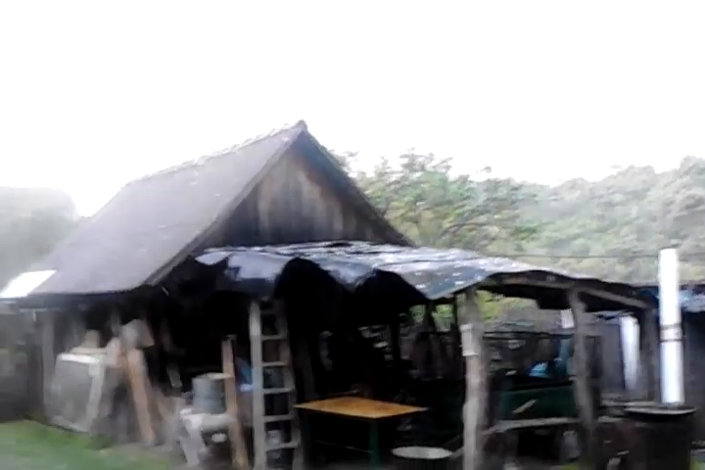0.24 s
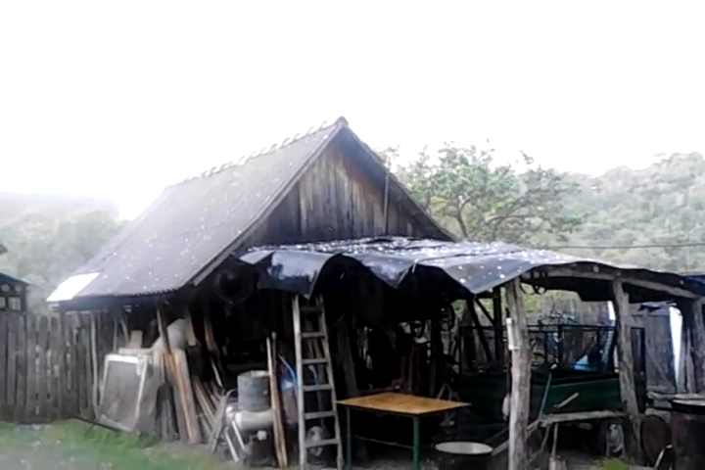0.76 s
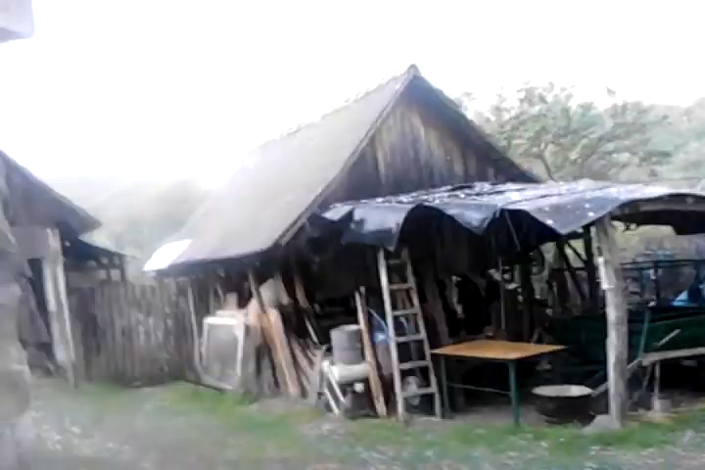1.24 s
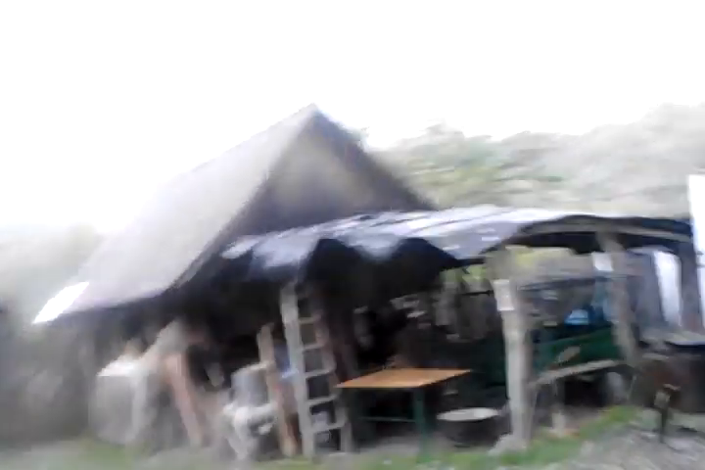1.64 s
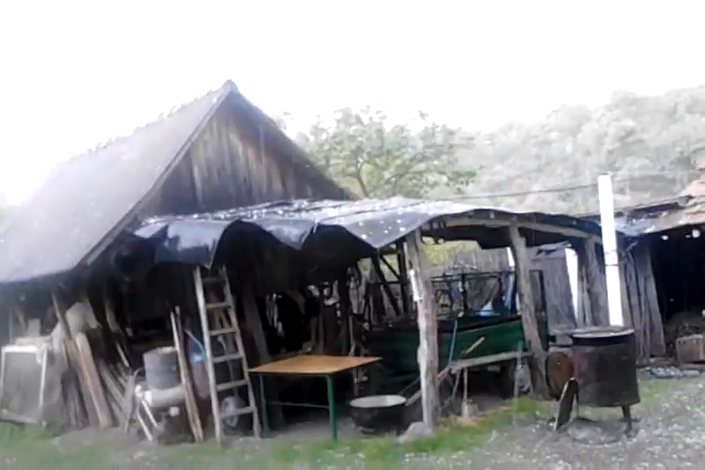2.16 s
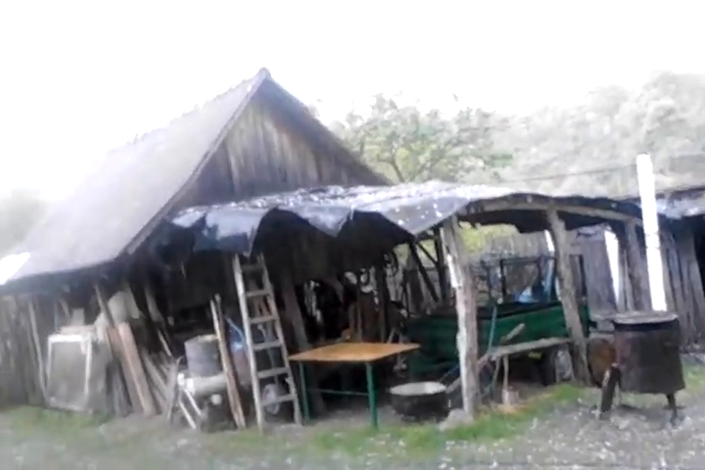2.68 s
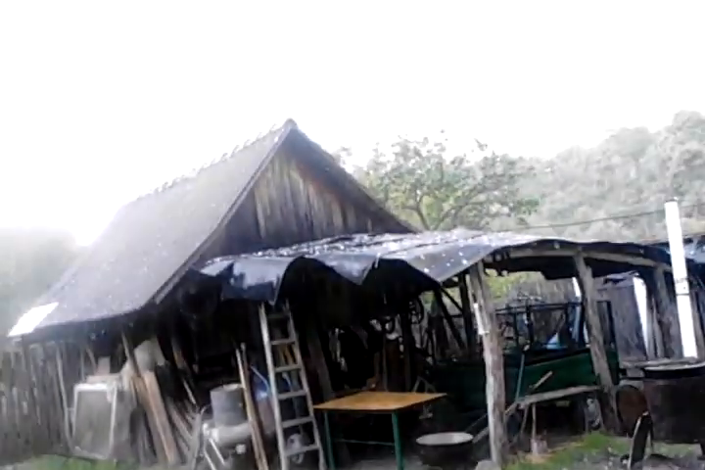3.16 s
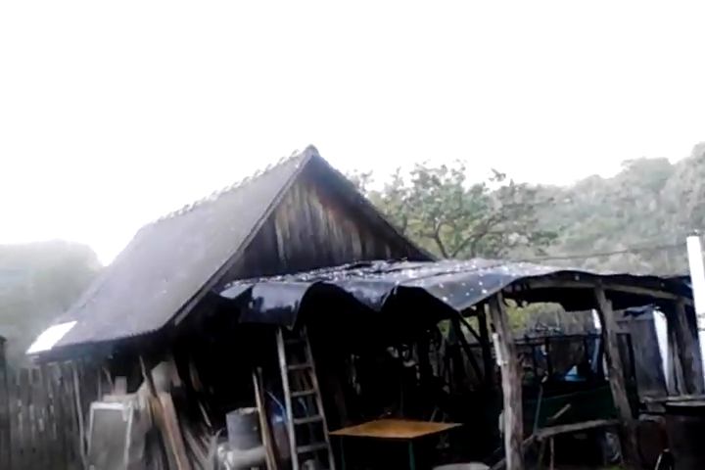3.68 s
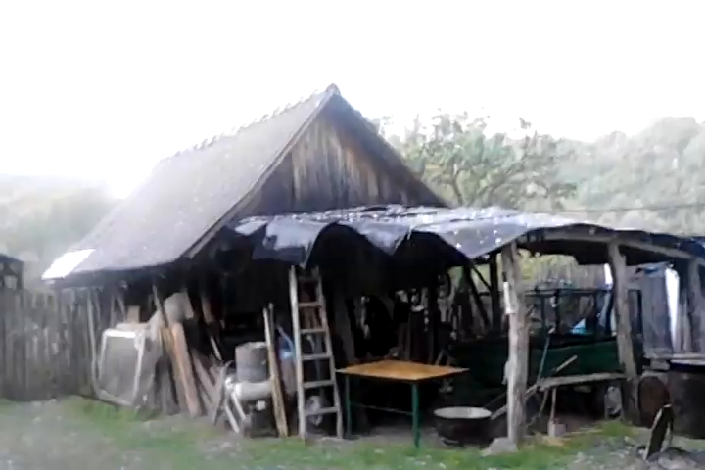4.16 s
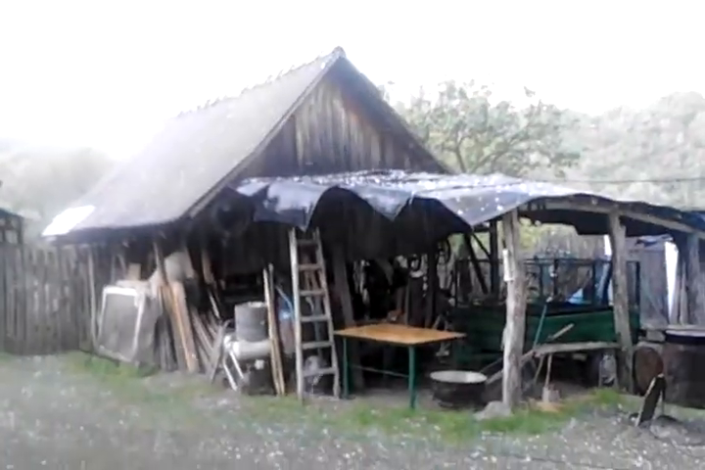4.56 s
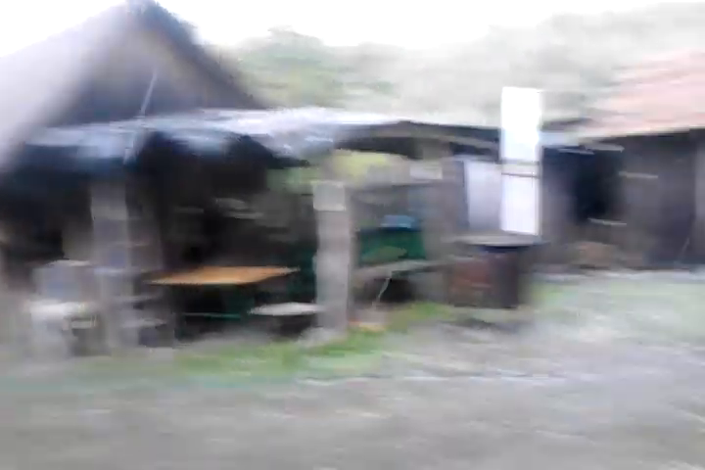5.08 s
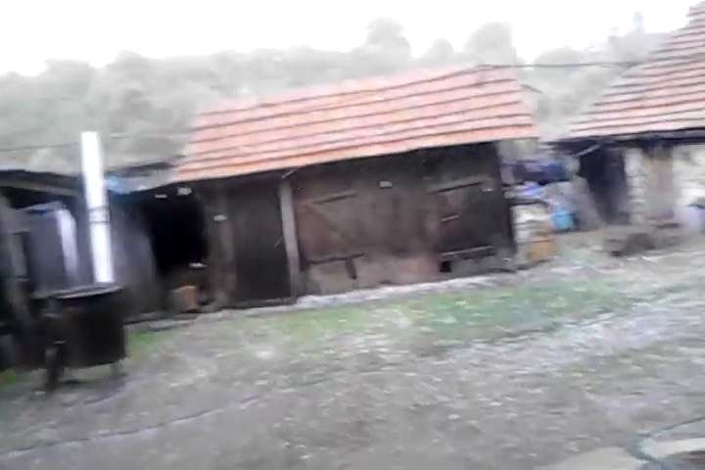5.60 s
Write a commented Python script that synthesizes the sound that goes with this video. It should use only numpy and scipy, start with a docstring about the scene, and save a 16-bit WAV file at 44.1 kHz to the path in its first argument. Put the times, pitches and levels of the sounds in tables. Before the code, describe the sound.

Large hailstones strike close by on a shed roof, boards and tarpaulin, each a dry brief clatter with short fluttering ring and tiny bounces. The quiet opening bursts into hard irregular hits after about a second, busiest around two to three seconds, then sparser and softer until a strong woody knock near the end. Behind lies a fluctuating hail hiss and rumble, outdoors, through a cheap single-capsule microphone.

```python
"""Large hailstones land close by on a shed roof, a tarpaulin and a yard: each gives a short clatter
of ice splinters, bounces and echoes, made of five bands of patchy noise.
Strikes and bounces ring boards, tarpaulin frame and roof sheets as fluttering damped tones.
Behind them countless far stones blur into a patchy noise hiss with a rumble that swells on its own.
All is heard through a small one-capsule microphone."""
import sys
import numpy as np
from scipy import signal
from scipy.fft import rfft, irfft
from scipy.io import wavfile
from scipy.ndimage import uniform_filter1d

SR = 44100
rng = np.random.default_rng(int(sys.argv[2]) if len(sys.argv) > 2 else 0)


def generate_wav(sig):
    """Save sig (samples, or channels by samples) to the path in sys.argv[1] as 16-bit PCM at SR."""
    pcm = np.round(np.clip(np.atleast_2d(sig).T, -1, 1) * 32767).astype(np.int16)
    wavfile.write(sys.argv[1], SR, pcm)


N = 257544
EDGE_HZ = 7330  # top of the band that the microphone passes

# the far hail shower: (time [s], hiss level [dB], lift of the rumble above the hiss [dB])
SHOWER = [(0.0, -57, 21.5), (0.23, -55.5, 13.5), (0.58, -58, 15), (1.22, -59.5, 11.5), (1.41, -48.5, 10),
          (1.74, -55.5, 18.5), (1.84, -51, 12.5), (2.019, -48.5, 7.5), (2.57, -48, 17.5), (2.81, -46, 8.5),
          (3.09, -47, 8), (3.48, -48.5, 14), (4.06, -47.5, 11.5), (4.26, -51.5, 11), (4.7, -54.5, 14.5),
          (4.98, -54, 6.5), (5.55, -58.5, 17.5), (5.69, -48, -9), (5.84, -47, 11.5)]
# modes of the roof sheets: (frequency [Hz], relative level [dB], t60 at ring length 1 [s])
SHEETS = [(1970, -2, 0.28), (2230, 4, 0.11), (2580, 3.5, 0.11), (2820, 3, 0.17), (3104, 2, 0.14),
          (3380, 0, 0.079), (3850, 2, 0.13), (4025, -6, 0.19), (4530, -2.5, 0.12), (4990, -7, 0.14),
          (5370, 0.5, 0.12), (5920, 0.5, 0.16), (6530, -2, 0.2), (6990, 7.5, 0.079)]


def gain_of(db):
    """Amplitude factor of a level in dB."""
    return 10 ** (np.asarray(db) / 20)


def evened(x):
    """Scales x to an RMS of one."""
    return x / np.sqrt(np.mean(abs(x) ** 2) + 1e-20)


def read(points, hz):
    """Reads a curve of (Hz, value) points along a logarithmic frequency axis."""
    f, value = np.transpose(points)
    return np.interp(np.log(hz + 1), np.log(f + 1), value)


def add(mix, s, sound):
    """Adds a sound to the mix from time s on, cut at the end of the mix."""
    part = mix[round(s * SR):][:len(sound)]
    part += sound[:len(part)]


def shaped(x, gain):
    """Multiplies the spectrum of x by gain(Hz)."""
    return irfft(rfft(x) * gain(np.fft.rfftfreq(N, 1 / SR)), N)


def patchy_noise(patch_db, flick_db, ping_db, ping_share, ping_t60=.2):
    """White noise with patches and wide-band flicks; small stones lift narrow bands that die away."""
    hop = 128
    frames = N // hop + 5
    real, imag, patch, flick = rng.standard_normal((frames, 257, 4)).T  # each: frequency x time

    # patches last longer, flicks span more of the spectrum
    patch = uniform_filter1d(patch, size=8, axis=0)
    patch = evened(uniform_filter1d(patch, size=16, axis=1))
    flick = uniform_filter1d(flick, size=40, axis=0)
    flick = evened(uniform_filter1d(flick, size=4, axis=1))

    draw, size = rng.random((frames, 257, 2)).T
    struck = (draw < ping_share) * gain_of(ping_db * (1 + size) / 2) ** 2
    kept_per_frame = gain_of(-120 * hop / SR / ping_t60)  # of the power, hence 120
    pings = signal.lfilter([1], [1, -kept_per_frame], struck, axis=1)
    pings = uniform_filter1d(pings, size=2, axis=0)

    spectrum = (real + 1j * imag) * gain_of(patch_db * patch + flick_db * flick) * np.sqrt(1 + pings)
    return evened(signal.istft(spectrum, nperseg=512, noverlap=512 - hop)[1][:N])


def shower_db(when):
    """Hiss level of the far shower at the given times."""
    s, hiss_db, _ = np.transpose(SHOWER)
    return np.interp(when, s, hiss_db)


def hiss():
    """Countless far stones blur into shaped noise; the rumble under 500 Hz swells on its own."""
    # spectrum of the far shower: (frequency [Hz], relative level per Hz [dB])
    far_spectrum = [(24, -43.5), (40, -3), (64, -23.5), (157, 5), (253, -8), (455, 1.5), (542, -2.5),
                    (750, 5), (1570, 7.5), (2950, 0.5), (5180, -0.5), (7180, -6.5), (9330, -50),
                    (15800, -120)]
    t = np.arange(N) / SR
    s, _, rumble_db = np.transpose(SHOWER)
    far = patchy_noise(patch_db=1.2, flick_db=1.6, ping_db=11.5, ping_share=.005)
    wash = evened(shaped(far, lambda hz: gain_of(read(far_spectrum, hz))))
    low = shaped(wash, lambda hz: 1 / (1 + (hz / 500) ** 4))
    rumble = low * gain_of(np.interp(t, s, rumble_db))
    return gain_of(shower_db(t)) * (wash - low + rumble)


def small_strikes():
    """Small stones strike at random moments, each at the pitch of one roof-sheet mode."""
    pings_per_s, reach_octaves, length = 24, 0.04, 0.7
    above_hiss_db, spread_db = -1, 2.5
    when, size, spot = rng.random((round(pings_per_s * N / SR), 3)).T
    s = when * N / SR
    db = shower_db(s) + above_hiss_db + spread_db * (2 * size - 1)
    spot_hz = np.array(SHEETS)[(spot * len(SHEETS)).astype(int), 0]
    return [(*row, reach_octaves, length) for row in zip(s, spot_hz, db)]


def ring(hz, db, rise, t60, rough=0.59, flutter_hz=30, flutter_per_khz=25):
    """A damped tone; neighbouring modes and echoes make it flutter, more so in the treble."""
    hold = 1.163  # above 1 a ring holds a moment and then dies quickly
    t = np.arange(round(.3 * SR)) / SR
    pole = np.exp(-2 * np.pi * (flutter_hz + flutter_per_khz * hz / 1000) / SR)
    real, imag = rng.standard_normal((len(t), 2)).T
    flutter = evened(signal.lfilter([1], np.poly([pole, pole]), real + 1j * imag))

    # low tones start clean, and all grow rougher as echoes arrive
    grown = np.clip(hz / 9000 + rough * t / 0.015, 0, .95)
    wander = np.sqrt(1 - grown ** 2) + grown * flutter
    tone = (wander * np.exp(2j * np.pi * hz * t)).imag

    up = np.sin(np.pi / 2 * np.minimum(t / rise, 1)) ** 2
    fall_db = -60 * (np.maximum(t - rise, 0) / t60) ** hold
    return gain_of(db + fall_db) * up * tone


def rings():
    """Each strike rings the few modes nearest its pitch, the farther ones more weakly."""
    # modes of boards and tarpaulin frame:
    # (frequency [Hz], relative level [dB], t60 at ring length 1 [s])
    boards = [(152, 0.5, 0.11), (184, 0, 0.25), (316.6, 4, 0.15), (429.4, 1, 0.11), (514.3, -0.5, 0.12),
              (601, 4, 0.12), (622, -2.5, 0.18), (681, 1.5, 0.14), (705, 5, 0.83), (812, -1.5, 0.12),
              (1051, 1, 0.11), (1220, 1, 0.097), (1440, 4.5, 0.095), (1660, 0.5, 0.15), (1807, -5, 0.093)]
    # stones and bounces that set the modes ringing: (time [s], pitch the struck spot favours [Hz],
    # level [dB], reach around that pitch [octaves], ring length [multiple of the mode's t60])
    strikes = [(0.058, 684, -54, .03, 1.5), (0.354, 5950, -49, .3, .7), (0.36, 589, -53, .03, 1.5),
               (0.386, 308, -54, .05, .9), (0.497, 1770, -46, .03, .7), (0.643, 153, -44.5, .05, .9),
               (0.725, 6050, -40, .15, .5), (0.738, 515, -42, 0.048, 3.2), (0.957, 1714, -49, .05, 1.9),
               (1.006, 6767, -41.5, .04, 1.1), (1.102, 3710, -44, .04, .9), (1.246, 3743, -41.5, .07, 1.3),
               (1.255, 1436, -48.5, .04, 1.6), (1.288, 812, -45, 0.044, 2.8), (1.335, 812, -33.5, .04, 3.5),
               (1.37, 1056, -22, .04, .9), (1.373, 1770, -9.5, .03, .8), (1.373, 292, -29, .1, .6),
               (1.41, 312, -27, .05, .8), (1.39, 3320, -37.5, .04, 3.2), (1.415, 588, -28, .04, .8),
               (1.489, 4020, -37.5, 0.031, 1.8), (1.601, 4430, -36, .04, .8), (1.693, 4500, -19.5, .3, .9),
               (1.706, 1645, -37, 0.023, 2.4), (1.721, 330.6, -40, .1, .9), (1.744, 3950, -31.5, 0.11, 1.6),
               (1.786, 5040, -29, .05, .9), (1.795, 1960, -45, .04, .9), (1.892, 5010, -27, .04, 1.6),
               (1.95, 1960, -39.5, .04, .9), (2.03, 1770, -24.5, .03, 1.6), (2.134, 2820, -27, .03, 1.1),
               (2.152, 2600, -25, .04, .9), (2.158, 1798, -26, .12, .9), (2.165, 671, -33, .04, .7),
               (2.17, 430, -36.5, .05, .9), (2.292, 1436, -24.5, .04, 1.1), (2.294, 3376, -36.5, .04, 1.1),
               (2.334, 1482, -31, .04, 2.4), (2.376, 1436, -43, .04, .9), (2.395, 6740, -36.5, .05, 1.4),
               (2.446, 4060, -36, .04, 1.1), (2.495, 3705, -29.5, .04, 1.6), (2.548, 1645, -38, .03, 1.7),
               (2.572, 5800, -27.5, .1, 1.9), (2.576, 3170, -29, .04, 1.2), (2.582, 4800, -30, .1, .8),
               (2.585, 1960, -32, .04, 1.4), (2.601, 4120, -24.5, .08, 1.2), (2.618, 2230, -31, .04, 1.3),
               (2.693, 1185, -13.5, 0.075, .3), (2.694, 1960, -14.5, 0.045, .3),
               (2.705, 1645, -18, .05, .9), (2.7, 4000, -35, .25, 1.2), (2.716, 1145, -19, 0.082, .9),
               (2.7, 811, -28.5, 0.082, .9), (2.754, 1185, -32, 0.048, 1.9), (2.921, 2275, -24, .04, .9),
               (2.96, 1056, -26.5, .04, 1.4), (2.976, 1185, -21, .04, 1.1), (2.95, 678.5, -34, 0.038, 1.3),
               (2.962, 1550, -31.5, 0.14, 1.5), (3.082, 6020, -39, .15, .9), (3.188, 3850, -42, .06, 1.9),
               (3.3, 6220, -32.5, .12, 1.4), (3.303, 3680, -29.5, 0.043, 2.6), (3.309, 1056, -37, .04, 3.5),
               (3.31, 2297, -35.5, 0.05, 3.2), (3.324, 5330, -31.5, .03, 1.4), (3.344, 1056, -23, .04, .8),
               (3.344, 804, -27.5, .04, 1.4), (3.33, 470, -27, .15, .9), (3.437, 1645, -35.5, .03, .5),
               (3.445, 182, -30.5, .05, 1.1), (3.5, 3730, -39, .04, .9), (3.557, 4412, -27.5, .04, 1.2),
               (3.659, 1056, -36, .04, .9), (3.671, 4580, -36, .04, .5), (3.78, 727, -35.5, .03, 1.3),
               (3.853, 812, -13.5, .04, .6), (3.853, 4050, -18, .04, .6), (3.854, 5540, -23.5, .07, .7),
               (3.862, 515, -13.5, .04, .8), (3.87, 430, -27, .05, .8), (3.895, 3726, -27, .04, .8),
               (3.944, 3980, -38.5, .08, 1.1), (3.995, 4300, -40.5, 0.17, .9), (4.092, 6970, -52, .04, .9),
               (4.19, 3680, -36, .04, .9), (4.475, 1185, -32, .04, .9), (4.474, 4450, -38, .2, .9),
               (4.522, 153, -37.5, .05, 1.4), (4.546, 3680, -33, .04, .6), (4.55, 6550, -41.5, .04, .7),
               (4.613, 3300, -32.5, .12, .4), (4.783, 312, -35.5, .05, 1.1), (4.934, 3370, -40.5, .04, .6),
               (5.123, 727, -48, 0.033, .3), (5.373, 6530, -44, .12, .7), (5.413, 312, -45.5, .05, .8),
               (5.452, 684, -47.5, .03, 1.6), (5.515, 552, -36, .07, 1.9), (5.578, 812, -46, .04, .8),
               (5.657, 635.6, -5.5, 0.049, .5), (5.678, 622, -12.5, 0.022, .9), (5.657, 503, -22, .04, 1.4),
               (5.669, 153, -20.5, .05, .6), (5.676, 3160, -31.5, .04, 1.4), (5.687, 4440, -31.5, .04, 1.5),
               (5.687, 1418, -25, 0.048, 1.2), (5.7, 1660, -30, .04, .6), (5.712, 2236, -28, .04, .7),
               (5.722, 622, -31, .03, 1.1), (5.73, 3140, -38, .04, .9)]
    nearest, reach_db = 4, 6  # modes per strike; loss one reach away from its pitch
    out, modes = np.zeros(N), np.array(boards + SHEETS)
    for s, spot_hz, db, reach, length in strikes + small_strikes():
        away = abs(np.log2(modes[:, 0] / spot_hz)) / reach
        for k in np.argsort(away)[:nearest]:
            hz, mode_db, t60 = modes[k]
            rise = (0.0043 + 1.2 / hz) * length ** 0.6  # a longer ring also swells more slowly
            add(out, s, ring(hz, db + mode_db - reach_db * away[k] ** 2, rise, t60 * length))
    return out


def roof_colour(hz):
    """The roof favours a few bands and passes no deep bass."""
    # resonances in the clatter: (centre [Hz], width [Hz], height [dB])
    resonances = [(783, 140, 6.5), (1140, 150, 3), (1700, 290, 4.5), (2120, 170, 0.5), (2820, 130, -1.5),
                  (3484, 230, 7), (4170, 300, 4.5), (5180, 760, 5), (5940, 350, 3.5), (6600, 250, 1.5),
                  (6900, 250, 1.5)]
    bumps_db = sum(db / (1 + (2 * (hz - centre_hz) / width) ** 2)
                   for centre_hz, width, db in resonances)
    return gain_of(bumps_db) / (1 + (115 / (hz + 1)) ** 4)


def swell(rise, fade, crack=0.04, crack_s=0.00085, tail_db=-22, tail=0.016):
    """Power of a clatter: a crack at the blow, a rise, a shoulder that drops away, a faint yard echo."""
    t = np.arange(round(.45 * SR)) / SR
    up = np.sin(np.pi / 2 * np.minimum(t / rise, 1)) ** 2
    after = np.maximum(t - rise, 0)
    shoulder = np.exp(-(after / fade) ** 2.4)
    echo = gain_of(tail_db) ** 2 * np.exp(-after / tail)
    blow = crack * np.e * t / crack_s * np.exp(-t / crack_s)
    return up * (shoulder + echo) + blow


def stones():
    """Near stones clatter in five overlapping noise bands; the thud peaks later, the treble fades sooner."""
    # centres of thud, knock, clack, crack and splinter: (frequency [Hz])
    band_hz = [230, 750, 1800, 3500, 5800]
    # clatter after each large stone: (time [s], level [dB], brightest band [0 thud - 4 splinter],
    # loss per band above the brightest [dB], rise above the thud band [s], fade of the thud band [s])
    large_stones = [(0.03, -45.5, 1.7, 11, 0.026, 0.014), (0.266, -52.5, 2, 5.5, 0.012, 0.025),
                    (0.35, -56.5, 4.5, 1, 0.01, 0.04), (0.493, -45.5, 1.66, 16, 0.0045, 0.047),
                    (0.72, -44.5, 1, 9, 0.0073, 0.047), (0.78, -42, -1.5, 7.5, 0.004, 0.046),
                    (0.83, -52, -0.2, 6.5, 0.013, 0.02), (0.958, -57, 2, 3.5, 0.0032, 0.02),
                    (1.006, -54.5, 2, 5, 0.006, 0.02), (1.092, -55, 2, 4.5, 0.014, 0.052),
                    (1.231, -51, 2, 3, 0.006, 0.085), (1.29, -54, -0.5, 7.5, 0.004, 0.067),
                    (1.338, -37, 2, 10, 0.0097, 0.017), (1.37, -34.5, 1.5, 4.5, 0.0062, 0.053),
                    (1.413, -38.5, 4, 4, 0.006, 0.04), (1.479, -51.5, 1.5, 1, 0.0053, 0.042),
                    (1.63, -43, 3, 8.5, 0.021, 0.046), (1.689, -29, 4, 3.5, 0.0073, 0.058),
                    (1.784, -35.5, 5, 3.5, 0.012, 0.052), (1.891, -37, 2.5, 4.5, 0.0058, 0.056),
                    (1.949, -41, 1.2, 11.5, 0.004, 0.031), (2.039, -58, 5, 3, 0.022, 0.029),
                    (2.132, -25.5, 2.1, 8.5, 0.032, 0.031), (2.225, -52.5, 4, 0.5, 0.013, 0.094),
                    (2.29, -38, 2, 8, 0.007, 0.035), (2.365, -37, 1.77, 9.5, 0.0082, 0.022),
                    (2.394, -44, 3.5, 12, 0.016, 0.1), (2.495, -37.5, 3, 4.5, 0.0058, 0.032),
                    (2.543, -37.5, 2.5, 15, 0.025, 0.045), (2.571, -29, 3.5, 7.5, 0.0067, 0.06),
                    (2.69, -28.5, 2.5, 10, 0.015, 0.038), (2.805, -44, 4.5, 1.5, 0.011, 0.031),
                    (2.919, -35.5, 1.86, 5, 0.021, 0.018), (2.952, -39, 0.94, 7, 0.004, 0.05),
                    (3.076, -39.5, 4, 13, 0.0087, 0.045), (3.172, -43, 3, 12, 0.011, 0.019),
                    (3.291, -35, 5.5, 1.5, 0.015, 0.051), (3.333, -32.5, 1.1, 9.5, 0.0028, 0.038),
                    (3.428, -44, 2.5, 4.5, 0.0082, 0.063), (3.499, -52, -1.5, 10, 0.0042, 0.092),
                    (3.553, -44, 1.5, 4, 0.012, 0.032), (3.658, -41.5, 3, 4.5, 0.01, 0.042),
                    (3.851, -28.5, 2.5, 6, 0.0045, 0.036), (3.938, -43, 2.6, 10, 0.0065, 0.06),
                    (3.989, -40.5, 5.5, 7, 0.005, 0.028), (4.087, -53.5, 1.5, 2.5, 0.007, 0.061),
                    (4.188, -48, 2.5, 4, 0.008, 0.048), (4.429, -50.5, 2.5, 4.5, 0.014, 0.032),
                    (4.467, -49, 1.5, -0.5, 0.008, 0.031), (4.524, -44.5, 7.5, 1.5, 0.017, 0.058),
                    (4.611, -38.5, 2.5, 23, 0.0025, 0.03), (4.689, -49, 2, 4, 0.007, 0.037),
                    (4.789, -50, 1, 3.5, 0.028, 0.013), (4.895, -52.5, 2, 6.5, 0.02, 0.036),
                    (5.122, -53, 1, 4, 0.003, 0.016), (5.225, -54, 1.5, 2.5, 0.029, 0.039),
                    (5.28, -56.5, 6.5, 0.5, 0.034, 0.045), (5.374, -47, 7, 1.5, 0.0056, 0.0075),
                    (5.415, -63.5, -5.5, 0, 0.056, 0.089), (5.504, -54.5, 3.5, 3, 0.0062, 0.064),
                    (5.653, -29.5, 0.4, 6, 0.012, 0.045), (5.672, -31.5, 1.67, 2, 0.012, 0.05)]
    thud_delay_s = 0.011
    bass_loss = 1.27  # bands below the brightest fall off this many times faster
    out, power = np.zeros(N), np.zeros((len(band_hz), N))
    for s, db, brightest, loss_db, rise, fade in large_stones:
        for band in range(len(band_hz)):
            late = thud_delay_s if band == 0 else 0
            bands_away = max(band - brightest, bass_loss * (brightest - band))
            level = gain_of(db - loss_db * bands_away)
            add(power[band], s, level ** 2 * swell(rise + late, fade * 0.92 ** band))

    near = patchy_noise(patch_db=2.1, flick_db=1.6, ping_db=13.5, ping_share=.008)
    noise = shaped(near, roof_colour)
    bin_hz = np.fft.rfftfreq(N, 1 / SR)
    place = np.interp(np.log(bin_hz + 1), np.log(band_hz), range(len(band_hz)))
    for band, band_power in enumerate(power):
        overlap = np.cos(np.pi / 2 * np.clip(place - band, -1, 1)) ** 2  # neighbours cross-fade
        out += np.sqrt(band_power) * evened(shaped(noise, lambda hz: overlap * (hz < EDGE_HZ)))
    return out


def scene():
    """One capsule feeds both channels."""
    return np.tile(hiss() + rings() + stones(), (2, 1))


def record(dry):
    """The small capsule loses the deep bass; then the steep band limit and faint converter noise."""
    bass_cut = signal.butter(N=1, Wn=150, btype="high", fs=SR, output="sos")
    thin = signal.sosfilt(bass_cut, dry)
    band_limit = signal.firwin(601, EDGE_HZ, window=("kaiser", 9), fs=SR)
    limited = signal.oaconvolve(thin, band_limit[None], "same")
    return limited + gain_of(-103) * rng.standard_normal((N, 2)).T


dry = scene()
out = record(dry)
generate_wav(out)
```